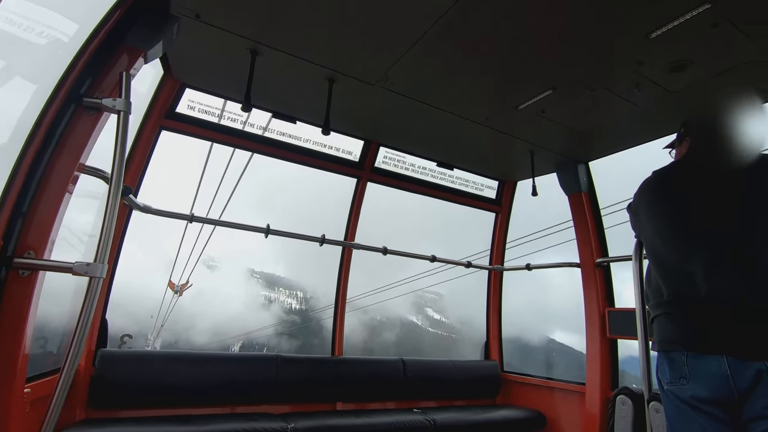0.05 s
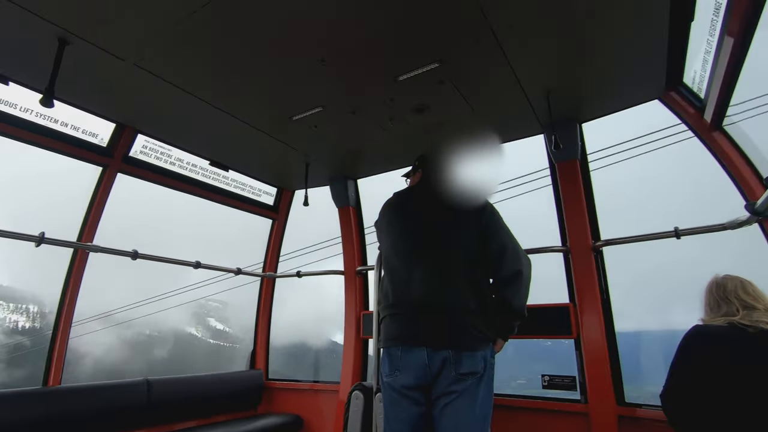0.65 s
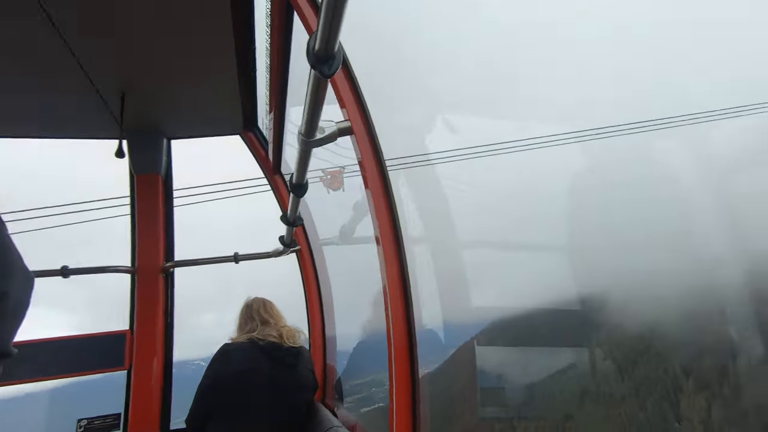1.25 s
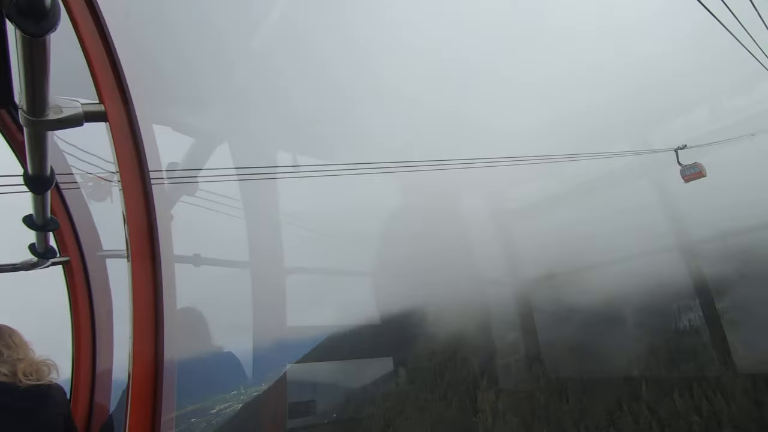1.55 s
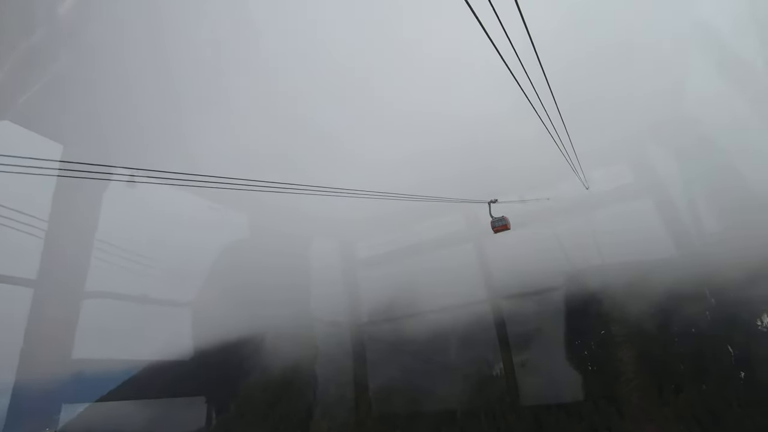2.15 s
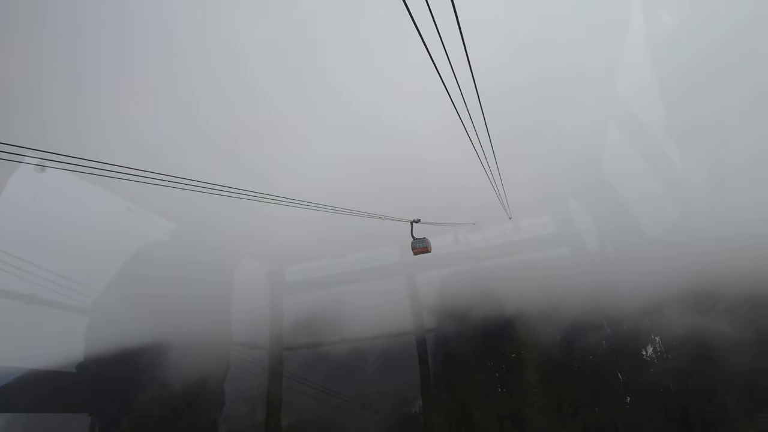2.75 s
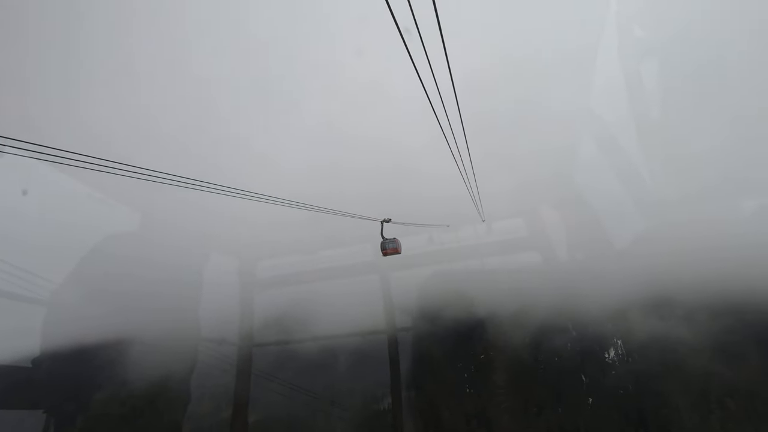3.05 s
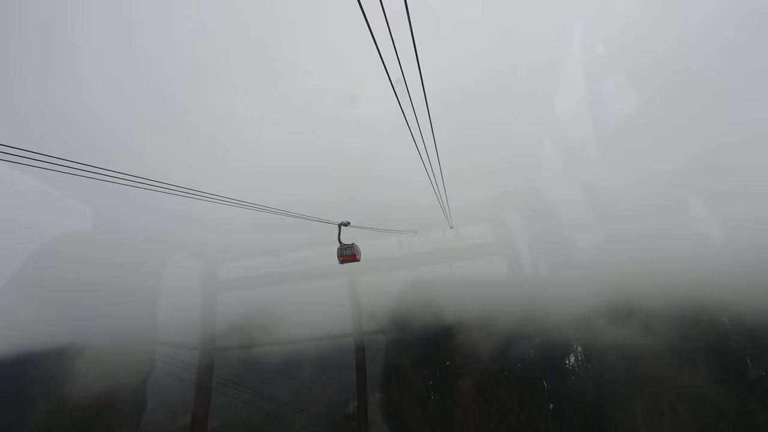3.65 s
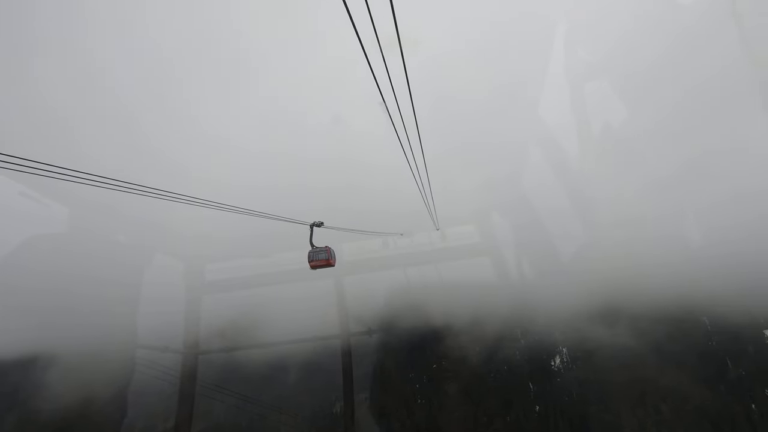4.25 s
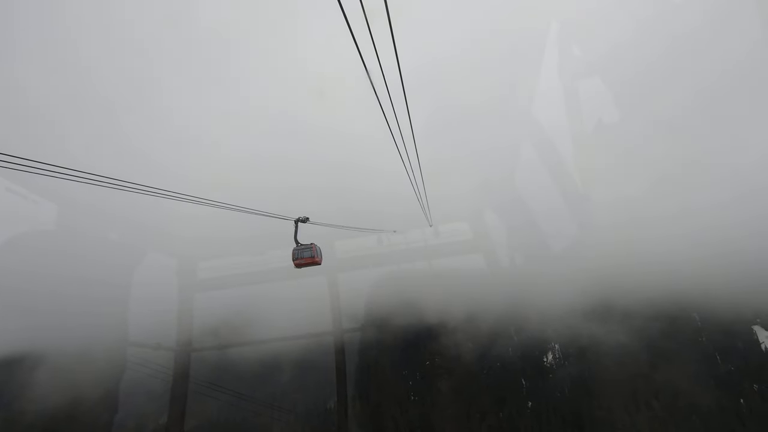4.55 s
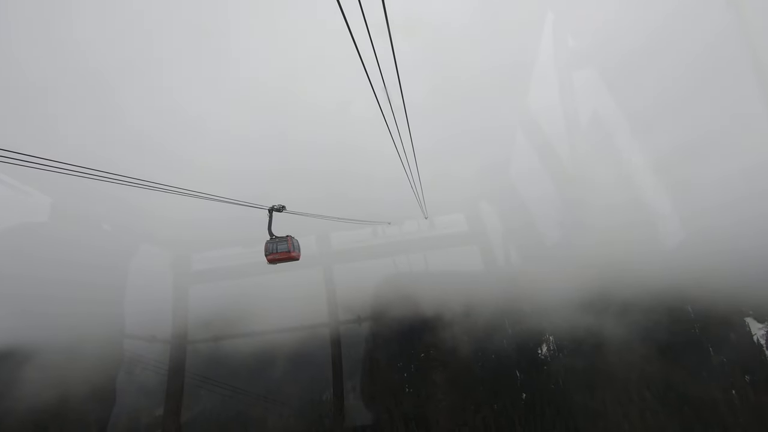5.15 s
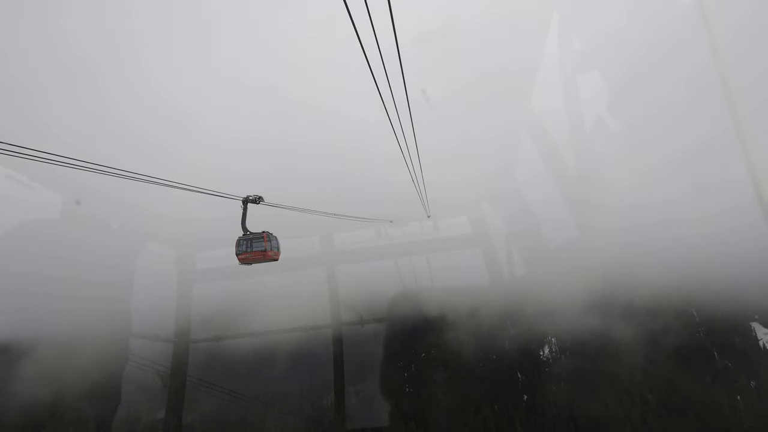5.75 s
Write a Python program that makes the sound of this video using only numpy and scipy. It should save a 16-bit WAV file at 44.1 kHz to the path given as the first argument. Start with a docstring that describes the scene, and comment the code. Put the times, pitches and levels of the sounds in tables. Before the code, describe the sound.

A gondola cabin rolls along its cables, heard from inside. For the whole six seconds there is a deep rumble and dull rolling roar, with a low drone that throbs about four times a second and swells unevenly, slightly stronger from around 2 seconds. Two thin hums come and go above it, and air brushes faintly on the windows.

Small, quiet sounds sit close to the microphone. From 0.2 to 0.8 seconds, the grip on a hand-held camera makes soft thumps, clicks and creaks amid swishing clothes. Cloth rubs more firmly around 1 to 1.3 seconds. A few ticks follow near 1.6 seconds, then clusters of creaks and light clacks from 2 to 2.2 and 2.6 to 2.8 seconds. Clothing rubs again around 3.5 seconds. The ride then continues almost alone, with a faint rustle and thin squeak near 5.7 seconds.

```python
"""Inside a gondola cabin rolling along its cables. The running gear forces the cabin into vibration:
its low resonances boom, beat and throb under two thin hums and a dull rolling roar, while air
brushes the windows. Close by, friction makes clothing swish, squeak and judder, and each slip of
the grip on a hand-held camera excites the damped modes of its shell as a thump, clack and tick."""
import sys
import numpy as np
from scipy import signal
from scipy.fft import rfft, irfft
from scipy.io import wavfile

SR = 44100
rng = np.random.default_rng(int(sys.argv[2]) if len(sys.argv) > 2 else 0)


def to_wav(s):
    """Save 16-bit WAV."""
    ch = np.atleast_2d(s).T  # columns
    pcm = np.round(np.clip(ch, -1, 1) * 32767)  # PCM
    wavfile.write(sys.argv[1], SR, pcm.astype(np.int16))


N = 256220
TIME, FREQS = np.arange(N) / SR, np.fft.rfftfreq(N, 1 / SR)


def gain_of(db):
    """Amplitude ratio of a level in decibels."""
    return 10 ** (np.asarray(db) / 20)

def unit_rms(x):
    """Normalisation to a mean power of 1."""
    return x / np.sqrt(np.mean(x ** 2) + 1e-20)

def spectrum(points):
    """Interpolation of a table over logarithmic frequency."""
    hz, value = np.transpose(points)
    return np.interp(np.log(FREQS + 1), np.log(hz + 1), value)

def follow(rows):
    """Linear interpolation over time, one curve for each column after the first."""
    s, *columns = np.transpose(rows)
    return [np.interp(TIME, s, column) for column in columns]

def panned(lean_db):
    """Gains for an interaural level difference, left minus right."""
    return gain_of(np.array([[lean_db], [-lean_db]]) / 2)

def wander(rate_hz):
    """Random fluctuation of rms 1: noise low-passed at the given rate."""
    return unit_rms(irfft(rfft(rng.standard_normal(N)) / (1 + (FREQS / rate_hz) ** 4), N))

def hump(centre_hz, width_hz):
    """Lorentzian resonance curve, with its full width taken at half height."""
    return 1 / (1 + ((FREQS - centre_hz) / width_hz * 2) ** 2)

def in_cabin(colour, drive):
    """Partial coherence: two independent drives become bass alike at both ears and diffuse treble."""
    # likeness of the two ears: f/Hz, correlation
    coherence = [(30, 0.93), (120, 0.99), (250, 0.97), (500, 0.83), (1000, 0.15), (2000, 0.2), (4000, 0.35),
                 (8000, -0.18), (12000, 0.66)]
    # left minus right: f/Hz, level difference/dB
    balance = [(30, -7), (120, -0.5), (250, -1.5), (500, -1.5), (1000, -1.4), (2000, 0.5), (4000, -1.5),
               (8000, -1.3), (12000, 2)]
    left, independent = rfft(drive)
    same = np.clip(spectrum(coherence), -1, 1)
    right = same * left + np.sqrt(1 - same ** 2) * independent
    lean = gain_of(spectrum(balance) / 2)
    return unit_rms(irfft(np.array([left * lean, right / lean]) * colour, N))

def noise(colour):
    """Spectral shaping of white noise, in stereo at rms 1."""
    return in_cabin(colour, rng.standard_normal((2, N)))

def resonance(pitch_hz, level_db, stray_hz, rate_hz, uneven_db):
    """A randomly driven resonator gives one tone that fluctuates in frequency and amplitude."""
    cycles = np.cumsum(pitch_hz + stray_hz * wander(rate_hz)) / SR + rng.random()
    tone = gain_of(uneven_db * wander(rate_hz)) * np.sin(2 * np.pi * cycles)
    return gain_of(level_db) * unit_rms(tone)

def cabin_drone(throb_hz=4.41, throb_depth=0.34, first_throb_s=.085):
    """Forced vibration of the strongest cabin mode, which throbs by amplitude modulation."""
    # slow swell: t/s, level/dB
    swell = [(0.0, -39), (.3, -36), (.4, -39.5), (.6, -34), (1.05, -40.5), (1.22, -34), (1.32, -33.5),
             (1.42, -31.5), (1.55, -33), (1.77, -29.5), (1.87, -47), (1.98, -31), (2.17, -26), (2.235, -33),
             (2.29, -34.5), (2.47, -30), (2.54, -44), (2.6, -30.5), (2.7, -26.5), (2.8, -33.5), (2.9, -47),
             (3.0, -27), (3.12, -44.5), (3.22, -30.5), (3.34, -35.5), (3.41, -36), (3.48, -42), (3.66, -30),
             (3.8, -35.5), (3.91, -39), (4.0, -35), (4.25, -35), (4.4, -33.5), (4.58, -26), (4.88, -29),
             (4.96, -32), (5.08, -29), (5.2, -32), (5.31, -27), (5.43, -32.5), (5.51, -28.5), (5.68, -36),
             (5.8, -30.5)]
    # the pitch drops a little on the way: t/s, f/Hz
    pitch = [(0, 109.6), (1.4, 110.3), (3.6, 109.2), (4.1, 107.1), (5.8, 107.9)]
    (level_db,), (pitch_hz,) = follow(swell), follow(pitch)
    # probably one throb for each turn of the wheels
    throb = 1 + throb_depth * np.cos(2 * np.pi * throb_hz * (TIME - first_throb_s))
    drone = resonance(pitch_hz, level_db, stray_hz=1.474, rate_hz=9.8, uneven_db=1.64)
    return throb * drone * panned(lean_db=-1.5)

def cabin_booms(upper_hz=74.66):
    """Two deep cabin resonances swell unevenly; the lower is a pair of close modes that beat."""
    # swell of the lower boom: t/s, level/dB
    lower_swell = [(0.0, -34.5), (1.52, -30), (1.66, -45), (1.8, -38), (2.1, -28), (2.28, -51.5),
                   (2.58, -26.5), (2.96, -40), (3.72, -30.5), (3.8, -35.5), (4.24, -30), (4.58, -41),
                   (4.78, -25.5), (4.96, -41), (5.14, -29.5), (5.32, -36.5), (5.52, -30), (5.8, -38.5)]
    # its two modes: f/Hz, relative level/dB
    mode_pair = [(51.5, -2.5), (57, -3.5)]
    # swell of the upper boom: t/s, level/dB
    upper_swell = [(0.0, -45), (0.26, -30), (0.42, -36), (0.66, -37.5), (0.8, -48.5), (0.92, -29.5),
                   (1.1, -39), (1.29, -33.5), (1.39, -34.5), (1.5, -27), (1.66, -35.5), (1.72, -28),
                   (1.8, -41), (1.87, -26.5), (2.02, -53), (2.11, -30.5), (2.28, -43), (2.42, -27.5),
                   (2.52, -42), (2.79, -31.5), (2.94, -45), (3.13, -27), (3.24, -27), (3.3, -41.5),
                   (3.39, -31.5), (3.47, -38), (3.54, -36), (3.82, -43.5), (4.19, -30.5), (4.32, -49),
                   (4.44, -28.5), (4.54, -46.5), (4.64, -32), (4.9, -42), (5.28, -44.5), (5.6, -29),
                   (5.8, -37.5)]
    (lower_db,), (upper_db,) = follow(lower_swell), follow(upper_swell)
    lower = sum(resonance(hz, lower_db + db, stray_hz=3.234, rate_hz=9.67, uneven_db=1.5)
                for hz, db in mode_pair)
    upper = resonance(upper_hz, upper_db, stray_hz=1.61, rate_hz=7.8, uneven_db=1.9)
    return (lower + upper) * panned(lean_db=-0.5)

def panel_hums(low_hz=190.8, high_hz=229.4):
    """Narrow-band vibration of two cabin panels: two thin hums come and go above the drone."""
    # swell of the hums: t/s, low hum level/dB, high hum level/dB
    swells = [(0, -60.5, -57.5), (.9, -67, -58.5), (1.12, -56, -46.5), (1.35, -55, -61),
              (1.65, -50.5, -44.5), (2.2, -45.5, -56), (2.6, -47.5, -47.5), (3.2, -43.5, -54),
              (3.6, -47.5, -57.5), (4.05, -46, -52.5), (4.35, -47, -62.5), (4.7, -42, -50),
              (5.2, -50, -59.5), (5.5, -52, -47.5), (5.8, -47, -59.5)]
    low_db, high_db = follow(swells)
    low = resonance(low_hz, low_db, stray_hz=2.4, rate_hz=14, uneven_db=3.0)
    high = resonance(high_hz, high_db, stray_hz=2.4, rate_hz=10, uneven_db=3.0)
    return (low + high) * panned(lean_db=-2.0)

def rolling(crossover_hz=240, deep_db=-37):
    """Wheels on the cable make broadband noise; structure-borne bass and panel resonances join it."""
    # spectrum of the roar: f/Hz, relative density level/dB
    roar_colour = [(4, -16.5), (14, -2), (40, 3.5), (90, 4.5), (130, -2), (200, -7.5), (260, -10.5),
                   (340, -18.5), (480, -22), (620, -25.5), (780, -29.5), (1000, -46), (2000, -62.5),
                   (5000, -88.5)]
    # strength of the rolling: t/s, gain of the upper roar/dB, gain of the frame's shaking/dB
    strength = [(0, -33.5, -1), (.35, -33.5, 0.5), (.6, -38, 1), (1.0, -36.5, -2), (1.45, -37, 2),
                (1.8, -33.5, 0.5), (2.2, -33, 1.5), (2.45, -35, 2.5), (2.75, -34, 3), (3.0, -35.5, 0.5),
                (3.4, -34.5, 2), (3.9, -37, 2.5), (4.5, -37, -2.5), (4.9, -38.5, 1.5), (5.81, -38, -4.5)]
    # weaker resonances of frame and panels: f/Hz, width/Hz, level before the shaking gain/dB
    panel_modes = [(33, 6.5, -42.5), (86.3, 13, -45.5), (120.6, 2.9, -52.5), (148.3, 32, -53),
                   (160, 12, -48.5), (173.3, 6.6, -51), (286, 30, -60.5)]
    roar_db, shake_db = follow(strength)
    roar = noise(gain_of(spectrum(roar_colour)))
    deep = irfft(rfft(roar) / (1 + (FREQS / crossover_hz) ** 6), N)
    panels = sum(gain_of(db) * noise(hump(hz, width)) for hz, width, db in panel_modes)
    frame = gain_of(shake_db) * (gain_of(deep_db) * deep + panels)
    return frame + gain_of(roar_db) * (roar - deep)

def window_air(flutter_db=.5):
    """Flow noise of air brushing the windows, slightly uneven in level."""
    # spectrum of the air: f/Hz, relative density level/dB
    air_colour = [(200, -13.5), (550, -4.5), (760, 5.5), (950, 1.5), (1300, 3.5), (1550, -1), (1800, -1),
                  (2400, -11.5), (3300, -17.5), (4400, -22), (6500, -29), (9500, -36), (11000, -47.5),
                  (13000, -54.5)]
    # swell of the air: t/s, level/dB
    swell = [(0, -60.5), (.9, -60.5), (1.3, -59.5), (1.8, -62.5), (2.3, -62.5), (2.7, -60.5), (3.2, -58),
             (3.7, -60.5), (4.3, -64.5), (4.42, -60), (4.85, -61), (5.1, -61.5), (5.81, -60.5)]
    air_db, = follow(swell)
    return gain_of(air_db + flutter_db * wander(rate_hz=13)) * noise(gain_of(spectrum(air_colour)))

def stroke(middle_s, length_s):
    """Gaussian envelope, its length taken between the 1/e points."""
    return np.exp(-((TIME - middle_s) / length_s * 2) ** 2)

def clothing(rustle_db=-77, grain_db=1.0, flutter_db=1.0):
    """Sliding friction of cloth on cloth: fibres catch and slip in dense tiny grains."""
    # spectrum of cloth on cloth: f/Hz, relative density level/dB
    cloth_colour = [(300, -15), (900, -1.5), (1900, 5), (2700, 3), (4100, -3), (5000, -5), (7300, -7.5),
                    (8400, -12), (9400, -11.5), (11000, -21), (12500, -21.5), (14000, -34.5)]
    # strokes over a faint constant rustle: middle t/s, length/s, level/dB
    swishes = [(0.325, 0.43, -65.5), (0.446, 0.089, -63), (0.842, 0.54, -66.5), (1.008, 0.045, -59),
               (1.065, 0.24, -63), (1.34, 0.48, -63.5), (1.635, 0.67, -70), (2.115, 0.4, -65.5),
               (2.548, 0.67, -68.5), (2.958, 0.32, -71.5), (3.30, 0.33, -64.5), (3.45, 0.36, -60.5),
               (4.003, 0.33, -76.5), (5.145, 0.36, -69.5)]
    # incoherent sources add in power
    power = gain_of(rustle_db) ** 2
    power += sum((gain_of(db) * stroke(s, length)) ** 2 for s, length, db in swishes)
    grains = rng.standard_normal((2, N)) * gain_of(grain_db * wander(rate_hz=900))
    flutter = gain_of(flutter_db * wander(rate_hz=45))
    return np.sqrt(power) * flutter * in_cabin(gain_of(spectrum(cloth_colour)), grains)

def rubs_and_ticks():
    """Band-limited noise bursts: cloth rubs, short sharp ticks of the handled camera, and very bright little
    snaps in the cloth."""
    # rubs, ticks and snaps: middle t/s, length/s, level/dB, centre f/Hz, width/Hz
    bursts = [(0.297, 0.32, -75, 4290, 3550), (0.3442, .0022, -58, 5300, 3000),
              (0.431, 0.012, -59, 3500, 1300), (0.437, 0.016, -59, 2650, 700),
              (0.438, .022, -68.5, 9200, 4000), (0.457, 0.082, -69, 4000, 2500),
              (0.77, 0.0034, -57, 2900, 1000), (0.828, 1, -70, 2410, 1015), (0.965, 0.86, -54, 325, 101.6),
              (1.008, .04, -75, 9800, 4000), (1.04, 0.094, -68, 4300, 2480), (1.005, .04, -56.5, 1650, 500),
              (1.066, 0.14, -61, 1880, 2460), (1.16, 0.091, -51.5, 406, 259),
              (1.24, 0.0023, -67, 10300, 4500), (1.362, 0.31, -77, 9160, 3540),
              (1.5905, 0.0014, -63.5, 5400, 2400), (1.641, .0016, -59, 3900, 3000),
              (2.164, .008, -69, 4200, 3500), (2.17, 0.13, -80, 6200, 1400), (2.249, .002, -55, 1900, 3200),
              (2.48, 0.15, -78, 8800, 3510), (2.528, 0.011, -72, 9100, 2500),
              (2.658, 0.0053, -59, 2600, 1500), (2.672, 0.23, -60.5, 687, 500),
              (2.662, .006, -72, 5500, 2500), (2.712, 0.011, -72, 6270, 1100),
              (2.7402, 0.0015, -56.5, 6000, 5500), (2.763, 0.0074, -61, 2900, 3000),
              (2.801, 0.0012, -66, 6870, 2500), (2.97, 0.2, -71, 5800, 5000), (3.428, 0.38, -69, 3940, 896),
              (3.363, .2, -75.5, 9000, 3470), (3.515, 0.16, -73.5, 8400, 5000),
              (3.484, 0.14, -57.5, 560, 400), (5.77, 0.31, -68.5, 3000, 2600),
              (5.758, 0.23, -84, 5350, 700)]
    return sum(gain_of(db) * stroke(s, length) * noise(hump(centre_hz, width_hz))
               for s, length, db, centre_hz, width_hz in bursts)

def grip_creaks(slips_per_s=70, uneven_db=3, thump_db=1, tick_db=-21):
    """Stick-slip of the grip: faint slips at random times, as rows of time, thump, clack and tick."""
    # spells of creaking: start t/s, end t/s, greatest clack level/dB
    creaks = [(0.178, 0.453, -52), (2.039, 2.248, -45), (2.568, 2.807, -48.5)]
    rows = []
    for start, end, db in creaks:
        for place, size in rng.random((round((end - start) * slips_per_s), 2)):
            clack_db = db + uneven_db * np.log(size + 1e-3)
            rows.append((start + place * (end - start), clack_db + thump_db, clack_db, clack_db + tick_db))
    return rows

def shell_ring(t, low_hz, high_hz, rise_cycles=0.5):
    """Damped free vibration of the shell's modes in one band, scaled to a peak of 1."""
    # modes of the camera shell: f/Hz, relative level/dB, T60/s
    shell_modes = [(110, 4.5, 0.035), (343, 0, .014), (560, -7.5, .01), (760, 6, 0.032), (1070, -9.5, .008),
                   (1320, 10, 0.005), (1740, 1.5, 0.0079), (2540, -4.5, 0.015), (3320, -8, 0.007),
                   (4700, -7.5, .004), (5900, 1, 0.0054), (6600, -1, .0045), (7440, -6.5, 0.0072),
                   (9000, -12, 0.0051), (11600, -17.5, .003)]
    sound = np.zeros(len(t))
    for hz, db, t60 in shell_modes:
        if low_hz < hz < high_hz:
            decay = gain_of(db + 2 * rng.standard_normal() - 60 * t / t60)
            rise = 1 - np.exp(-t * hz / rise_cycles)  # soft skin pushes gradually
            sound += decay * rise * np.sin(2 * np.pi * hz * rng.uniform(0.93, 1.05) * t)
    return sound / abs(sound).max()

def handling(echo_db=-9, echo_t60_s=0.062):
    """Impulse excitation: each slip of the grip rings the camera shell, with a short reverberation."""
    # distinct slips, by their peaks: t/s, thump level/dB, clack level/dB, tick level/dB
    knocks = [(0.1799, -31, -37, -64), (0.1915, -33, -43, -50), (0.268, -34, -49, -61),
              (0.2984, -32, -50, -61), (0.344, -29, -44, -56), (0.444, -30, -48, -54),
              (0.567, -36, -51, -68.5), (0.689, -36, -46, -65), (0.767, -42, -42, -60),
              (1.5903, -41, -47, -56.5), (1.6405, -43.5, -45, -66), (1.686, -39, -43.5, -65),
              (1.962, -38, -43, -63), (1.994, -31, -56, -68), (2.084, -37, -45, -64),
              (2.16, -37.5, -41, -65), (2.2214, -43, -40, -69), (2.2475, -41, -42, -67),
              (2.585, -39, -44, -64), (2.608, -46, -50, -64), (2.631, -44, -45.5, -69),
              (2.6585, -35.5, -42.5, -65), (2.682, -43, -38, -70), (2.707, -39.5, -41, -64),
              (2.71, -45, -45, -61), (2.734, -49, -37.5, -66), (2.762, -39, -40, -65),
              (2.8005, -37, -41, -63)]
    t, out = np.arange(SR // 10) / SR, np.zeros((2, N))
    rocking = np.array([[-1], [1]])  # the shell rocks sideways, driving left and right in antiphase
    for s, thump_db, clack_db, tick_db in knocks + grip_creaks():
        thump = gain_of(thump_db) * shell_ring(t, 0, 600)
        clack = gain_of(clack_db) * shell_ring(t, 600, 3000)
        tick = gain_of(tick_db) * shell_ring(t, 3000, SR / 2)
        direct = rocking * (thump + clack) + panned(lean_db=-6) * tick
        reflections = rng.standard_normal((2, len(t))) * gain_of(-60 * t / echo_t60_s)
        reflections /= np.linalg.norm(reflections[0])
        echo = signal.fftconvolve((clack + tick)[None], reflections, axes=1)[:, :len(t)]
        start = round(s * SR)
        out[:, start:start + len(t)] += direct + gain_of(echo_db) * echo
    return out

def squeaks():
    """Friction-excited oscillation: a rub briefly sings as one thin, fluttering tone."""
    # singing rubs: middle t/s, length/s, level/dB, f/Hz, rms deviation/Hz
    rubs = [(0.438, 0.017, -58.5, 2550, 69.8), (5.747, 0.22, -76, 3190, 14), (5.745, 0.14, -84, 5190, 90)]
    tones = sum(stroke(s, length) * resonance(hz, db, stray_hz, rate_hz=80, uneven_db=5.0)
                for s, length, db, hz, stray_hz in rubs)
    return tones * panned(lean_db=-1)

def cloth_pushes(attack_s=.01, release_s=0.029, jerk_db=1.0, jerk_hz=90):
    """Stick-slip under load: pressed cloth gives way at once, judders and dies away exponentially."""
    # firm rubs: start t/s, hold/s, level/dB, centre f/Hz, width/Hz
    rubs = [(0.984, 0.014, -58.5, 3900, 3800), (1.131, 0.045, -51.5, 1100, 1350),
            (3.406, 0.051, -54, 740, 746), (3.484, .016, -52, 980, 1100)]
    out = np.zeros((2, N))
    for start, hold, db, centre_hz, width_hz in rubs:
        age = TIME - start
        attack = np.clip(age / attack_s, 0, 1)
        release = np.exp(-np.maximum(age - attack_s - hold, 0) / release_s)
        out += gain_of(db) * attack * release * noise(hump(centre_hz, width_hz))
    return out * gain_of(jerk_db * wander(jerk_hz))

def scene():
    """Superposition of the ride and the small sounds close by."""
    ride = cabin_drone() + cabin_booms() + panel_hums() + rolling() + window_air()
    return ride + clothing() + rubs_and_ticks() + handling() + squeaks() + cloth_pushes()

def record(dry, edge_hz=13600):
    """Band limiting by a zero-phase low-pass, with a few milliseconds of fade at both ends."""
    lowpass = signal.butter(14, edge_hz, fs=SR, output="sos")
    return signal.sosfiltfilt(lowpass, dry * signal.windows.tukey(N, .002))


dry = scene()
out = record(dry)
to_wav(out)
```